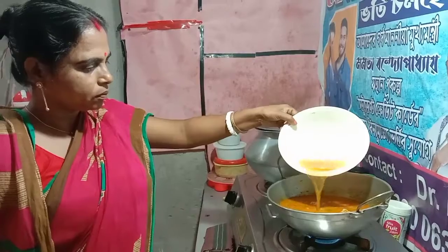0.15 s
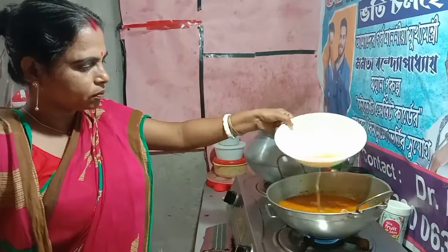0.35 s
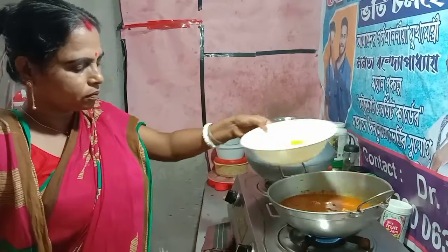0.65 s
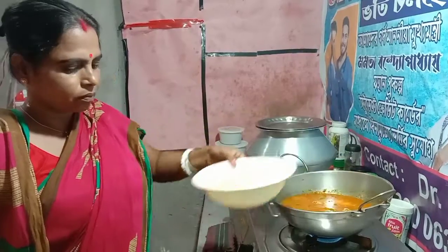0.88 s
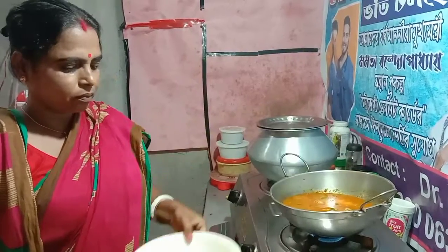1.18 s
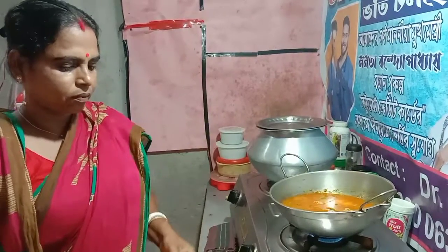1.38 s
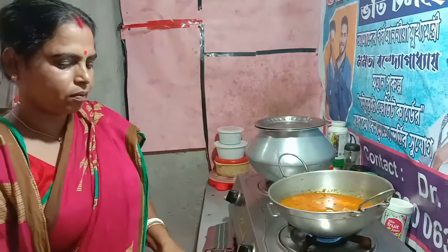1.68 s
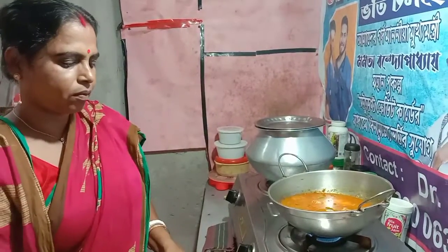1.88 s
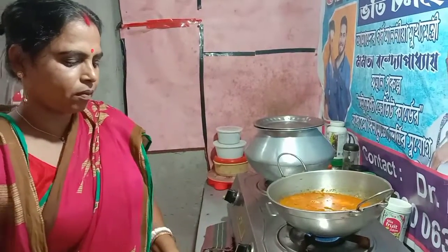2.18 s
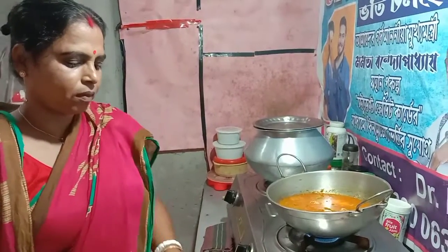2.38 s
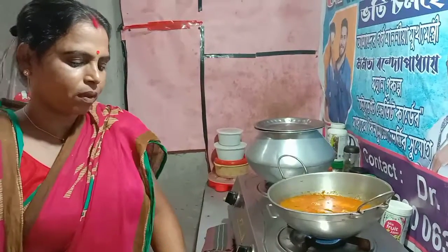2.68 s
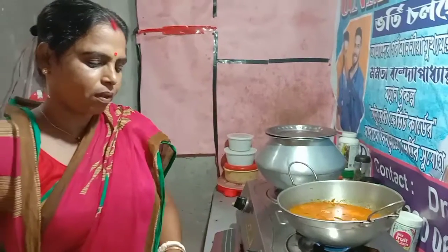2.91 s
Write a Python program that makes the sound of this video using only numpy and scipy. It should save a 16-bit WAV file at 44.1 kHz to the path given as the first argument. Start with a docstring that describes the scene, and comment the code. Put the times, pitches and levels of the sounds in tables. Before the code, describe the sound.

Metal cookware lands loudly, drags grittily and squeals in a small kitchen over a faint simmer.

```python
"""A quiet kitchen: a pan simmers in uneven coloured noise, with low resonances that knock and gurgle.
A few drops tick as short noise bands, then a steel bowl is put down: noise bursts and ringing modes.
A steel vessel lands with a clang and is dragged: gritty noise scrapes, more bursts bump, and gliding
tones with overtones squeal, jumping from mode to mode."""
import sys
import numpy as np
from scipy import signal
from scipy.fft import rfft, irfft, next_fast_len
from scipy.io import wavfile
from scipy.ndimage import uniform_filter1d

SR = 44100
rng = np.random.default_rng(int(sys.argv[2]) if len(sys.argv) > 2 else 0)


def linear_from_db(decibels):
    """Turn decibels (scalar or array-like) into linear amplitude factors; 0 gives 1."""
    return 10 ** (np.asarray(decibels, float) / 20)


def store_pcm(level_fs):
    """Save levels as 16-bit WAV."""
    pcm = np.round(np.clip(level_fs, -1, 1) * 32767).astype(np.int16)
    wavfile.write(sys.argv[1], SR, np.atleast_2d(pcm).T)


N = 134505  # length in samples


def evened(x):
    """Scales a signal to an rms of one."""
    return x / np.sqrt(np.mean(x ** 2) + 1e-20)


def read(points, hz):
    """Reads a curve of (frequency, dB) points, straight over log frequency."""
    f, value = np.transpose(points)
    return np.interp(np.log(hz + 1), np.log(f + 1), value)


def add(mix, s, sound):
    """Lays a sound into the mix from s seconds on."""
    part = mix[round(s * SR):][:len(sound)]
    part += sound[:len(part)]


def coloured(x, gain):
    """Filters by a gain given from zero to the top frequency, padded so that nothing wraps round."""
    size = 2 * next_fast_len(len(x) // 2 + SR // 8)
    place = np.linspace(0, 1, size // 2 + 1)
    full_gain = np.interp(place, np.linspace(0, 1, len(gain)), gain)
    return irfft(rfft(x, size) * full_gain)[:len(x)]


def slow(per_s):
    """Smooth random wander with an rms of one: white noise averaged twice over 1 / per_s seconds."""
    size = max(int(SR / per_s), 2)
    return evened(uniform_filter1d(uniform_filter1d(rng.standard_normal(N), size), size))


def steady_floor():
    """Unchanging background hiss: white noise with a fixed colour."""
    # Each row: frequency in Hz, relative density in dB per Hz.
    floor_colour = [(29, -34), (50, -3), (296, -2), (1010, -6.5), (1280, 2.5), (3430, -14), (5820, -19),
                    (7390, -7), (8140, -20), (9860, -13), (13500, -15.5), (15600, -6.5)]
    floor_db = -61
    gain = linear_from_db(read(floor_colour, np.fft.rfftfreq(N, 1 / SR)))
    return linear_from_db(floor_db) * evened(coloured(rng.standard_normal(N), gain))


def patchy_grit():
    """White noise with sparse grains, made patchy over time and frequency."""
    grains_per_s, grain_spread_db, grain_share, patch_db = 2500, 1.3, 0.38, 4.3
    grain_db = grain_spread_db * np.minimum(rng.exponential(1, N), 3.5)
    grit = rng.standard_normal(N) * linear_from_db(grain_db)
    grit *= rng.random(N) < grains_per_s / SR
    drive = rng.standard_normal(N) + grain_share * evened(grit)
    z = signal.stft(drive, nperseg=512, noverlap=384)[2]
    patches = uniform_filter1d(rng.standard_normal(z.shape), 5, 0)  # smooth across frequency
    patches = evened(uniform_filter1d(patches, 20, 1))  # smooth across time
    return signal.istft(z * linear_from_db(patch_db * patches), nperseg=512, noverlap=384)[1][:N]


def simmer_and_scrape():
    """Hiss and grit of simmer, handling and scraping through steel resonances, in four moving bands."""
    # Two stretches. Each row: time in seconds, then rumble, low and middle level in dB;
    # the middle is lifted by middle_lift_db below.
    band_levels = [
        [(0.11, -87, -68.5, -68.5), (0.165, -77, -63, -59), (0.47, -73, -58.5, -61), (0.54, -60, -55, -64),
         (0.672, -81, -70, -78.5), (0.79, -67, -51.5, -50.5), (0.858, -51.5, -49, -47),
         (1.03, -66, -57.5, -57.5), (1.138, -79, -60.5, -64.5), (1.168, -68, -73, -55.5),
         (1.262, -68, -49, -40.5), (1.512, -74, -68.5, -65.5), (1.748, -73, -59.5, -63),
         (1.765, -66, -53.5, -57.5)],
        [(1.8, -35.5, -39, -42.5), (1.918, -45, -44.5, -51), (2.056, -46, -38.5, -37.5),
         (2.322, -65.5, -50, -45), (2.38, -41.5, -35.5, -44), (2.416, -44.5, -40, -54.5),
         (2.586, -52.5, -48.5, -37), (2.676, -83, -40, -42), (2.77, -49, -33.5, -45.5),
         (2.916, -63.5, -65, -50), (3.018, -43, -53, -39.5), (3.05, -60, -21.5, -27)],
    ]
    # Each row: time in seconds, level of the treble hiss in dB.
    treble_level = [(0, -85), (1.12, -70), (1.19, -57), (1.26, -70), (1.42, -60.5), (1.765, -66.5),
                    (1.79, -38), (1.92, -69.5), (2.0, -47), (2.06, -45.5), (2.12, -55), (2.145, -36),
                    (2.22, -54), (2.47, -52), (2.56, -47.5), (2.67, -44), (2.8, -57), (3.0, -48),
                    (3.05, -32)]
    # Borders between rumble, low, middle and treble, in Hz.
    split_hz = [300, 1800, 6200]
    # Colour below the treble band. Each row: frequency in Hz, relative density in dB per Hz.
    noise_colour = [(29, -39), (50, -5), (243, -5), (501, -8.5), (1250, -13), (1400, -14.5), (3490, 14.5),
                    (5710, 2.5), (8200, -6), (10700, -74), (18000, -120)]
    # Resonances of the steel. Each row: frequency in Hz, width in Hz, height over the noise in dB.
    body = [(84.8, 15.3, 14.5), (165.8, 13, 9.5), (1260, 100, 14.5), (2170, 44, 8.5), (2576, 210, 6),
            (3920, 280, 5), (5630, 180, 16.5)]
    # Colour of the treble band. Each row: frequency in Hz, relative density in dB per Hz.
    treble_colour = [(4120, 15), (7000, 8), (8030, 2.5), (10200, 3.5), (12200, -9), (13300, -17),
                     (14800, 5.5), (15600, -56.5)]
    middle_lift_db = 4

    hz, t = np.fft.rfftfreq(N, 1 / SR), np.arange(N) / SR
    drive = patchy_grit()
    resonance_db = sum(db / (1 + (2 * (hz - f) / w) ** 2) for f, w, db in body)
    steel_gain = linear_from_db(read(noise_colour, hz) + resonance_db)
    gains = [steel_gain, steel_gain, steel_gain, linear_from_db(read(treble_colour, hz))]
    # share of the power below each border; neighbours differ by one band
    below = [0 * hz] + [1 / (1 + (hz / f) ** 12) for f in split_hz] + [1 + 0 * hz]
    s, rumble, low, middle = np.vstack(band_levels).T
    levels = [(s, rumble), (s, low), (s, middle + middle_lift_db), np.transpose(treble_level)]
    out = np.zeros(N)
    for k in range(4):
        band_gain = gains[k] * np.sqrt(abs(below[k + 1] - below[k]))
        out += linear_from_db(np.interp(t, *levels[k])) * evened(coloured(drive, band_gain))
    return out


def hollow(s, hz, db, t60):
    """One low resonance that swells quickly and dies."""
    rise_s = 0.0085
    t = np.arange(SR // 2) / SR
    envelope = np.minimum(t / rise_s, 1) * linear_from_db(db - 60 * t / t60)
    return s, envelope * np.sin(2 * np.pi * (hz * t + rng.random()))


def hollows(mix):
    """Hollow knocks and gurgles, each a single decaying resonance."""
    # Each row: start in seconds, frequency in Hz, level in dB, decay t60 in seconds.
    knocks = [(0.444, 1286, -50, 0.37), (0.797, 369.5, -47, 0.32), (1.04, 359, -41, 0.067),
              (1.239, 421, -56, 0.39), (2.058, 250, -38, 0.19), (2.082, 343.3, -43.5, 0.74),
              (2.081, 452.4, -35, 0.31), (2.362, 166.7, -36.5, 0.33), (2.361, 233.7, -42.5, 0.52),
              (2.469, 178, -35.5, 0.22), (2.733, 83.5, -34.5, 0.19), (2.732, 160, -40, 0.3)]
    for row in knocks:
        add(mix, *hollow(*row))


def tick(s, db, hz):
    """A short band of noise around one frequency, over a faint wide spread."""
    t60, trim_db, width_hz, wide_share = 0.035, -7, 380, 0.02
    t = np.arange(SR // 8) / SR
    band = 1 / (1 + ((np.fft.rfftfreq(len(t), 1 / SR) - hz) / width_hz) ** 2) + wide_share
    envelope = linear_from_db(db + trim_db - 60 * t / t60)
    return s, envelope * evened(coloured(rng.standard_normal(len(t)), band))


def drops(mix):
    """Drops and ticks, each a quickly dying noise band."""
    # Each row: start in seconds, level in dB before the trim in tick(), centre in Hz.
    tick_list = [(0.439, -34.5, 5660), (0.5297, -27, 4260), (0.582, -37, 4860)]
    for row in tick_list:
        add(mix, *tick(*row))


def blow(s, db, t60, ring_db, modes, colour, split):
    """A burst of rattling noise and the ringing modes of the thing struck, damped by the contact."""
    crack_db, crack_t60, rise_s = -1, 0.012, 0.00086
    rattle_db, ring_longer, luck_db = -5.5, 1.8, 7.9
    t = np.arange(SR // 2) / SR
    gain = linear_from_db(read(colour, np.fft.rfftfreq(len(t), 1 / SR)))
    burst = evened(coloured(rng.standard_normal(len(t)), gain))
    cluster = modes * 3  # every mode is a close cluster of three
    ring = np.zeros(len(t))
    for (f, mode_db, long), (u, phase, w) in zip(cluster, rng.random((len(cluster), 3))):
        decay = linear_from_db(mode_db + luck_db * u - 60 * t / min(long, ring_longer * t60))
        hz = f * (1 + split * (2 * w - 1))
        ring += decay * np.sin(2 * np.pi * hz * t + 2 * np.pi * phase)
    rattle = linear_from_db(rattle_db - 60 * t / t60) + linear_from_db(crack_db - 60 * t / crack_t60)
    return s, linear_from_db(db) * np.minimum(t / rise_s, 1) * (rattle * burst + linear_from_db(ring_db) * ring)


def bowl_down(mix):
    """The steel bowl touches down; it rings more cleanly than the vessel, its clusters being tighter."""
    # Each row: start in seconds, level in dB, rattle t60 in seconds, ring level against it in dB.
    taps_down = [(1.21, -57.5, 0.37, 16), (1.2349, -22.5, 0.08, -9)]
    # Modes. Each row: frequency in Hz, least level in dB, longest decay t60 in seconds.
    bowl_modes = [(2533, -4.5, 0.57), (3973, -9.5, 0.48), (5500, -17, 0.29)]
    # Colour of the burst. Each row: frequency in Hz, relative density in dB per Hz.
    bowl_colour = [(2650, -45), (4500, -10), (5540, -8), (8180, -19.5), (11600, -4), (15600, -6)]
    for row in taps_down:
        add(mix, *blow(*row, bowl_modes, bowl_colour, split=0.005))


def vessel_bumps(mix):
    """The steel vessel lands and bumps along, each blow a rattle with widely clustered modes."""
    # Each row: start in seconds, level in dB, rattle t60 in seconds.
    bump_list = [(1.775, -12, 0.22), (2.136, -21, 0.039), (2.354, -30.5, 0.054), (2.6314, -23.5, 0.039),
                 (2.6603, -14.5, 0.054), (2.746, -28.5, 0.062), (2.818, -27.5, 0.027), (3.035, -32, 0.4)]
    # Modes. Each row: frequency in Hz, least level in dB, longest decay t60 in seconds.
    vessel_modes = [(1320, -12.5, 0.1), (2010, -15, 0.36), (2870, -7.5, 0.056), (3274, -9, 0.5),
                    (3517, -4, 0.076), (3610, -13, 0.3), (3860, -9, 0.47), (4800, -38, 0.19)]
    # Colour of the burst. Each row: frequency in Hz, relative density in dB per Hz.
    bump_colour = [(60, -47), (487, -21), (912, -18.5), (1260, -3.5), (1420, -19), (2060, -9.5),
                   (2700, -13.5), (3500, 3), (4100, -2), (5860, -23.5), (15600, -30)]
    for row in bump_list:
        add(mix, *blow(*row, -10, vessel_modes, bump_colour, split=0.014))  # ring at -10 dB


def squeals():
    """Stick-slip locks onto modes; the contact adds overtones, sum and difference tones."""
    # One curve per squeal. Each row: time in seconds, pitch in Hz, level in dB.
    squeal_curves = [
        [(1.98, 4990, -48), (2.062, 4964, -35), (2.114, 4953, -42), (2.204, 5011, -26), (2.232, 4988, -36),
         (2.296, 4984, -30), (2.45, 4980, -41)],
        [(2.17, 2828, -33), (2.255, 2798, -26), (2.282, 2792, -38), (2.4, 2794, -44)],
        [(2.2, 5613, -53), (2.25, 5580, -30), (2.304, 5566, -20), (2.37, 5547, -32), (2.395, 5544, -46)],
        [(2.3, 2561, -47), (2.356, 2584, -25), (2.436, 2577, -22), (2.476, 2540, -18), (2.568, 2592, -29),
         (2.616, 2538, -30), (2.645, 2545, -37)],
        [(2.59, 5842, -41), (2.63, 5855, -20), (2.654, 5858, -18), (2.684, 5883, -23), (2.71, 5857, -18),
         (2.77, 5823, -23), (2.802, 5871, -31), (2.856, 5844, -32), (2.89, 5790, -41), (2.95, 5810, -43)],
        [(2.79, 5339, -52), (2.822, 5280, -30), (2.854, 5320, -19), (2.886, 5329, -16), (2.91, 5324, -22),
         (2.94, 5329, -21), (3.018, 5225, -26), (3.05, 5323, -27)],
        [(2.795, 3300, -44), (2.83, 3419, -29), (2.93, 3400, -31), (2.97, 3290, -32), (3.03, 3170, -33)],
        [(2.82, 3826, -48), (2.88, 3860, -33), (2.95, 3930, -33), (3.05, 3870, -34)],
        [(2.88, 4914, -42), (3.002, 4982, -35), (3.05, 4932, -24)],
    ]
    # One row per squeal: levels of harmonics 2 and up, in dB against its fundamental.
    overtone_levels = [
        [-17, -27.5],
        [-22],
        [-56],
        [-16.5, -33, -27, -40],
        [-27.5],
        [-15],
        [-19, -29],
        [-45],
        [-33],
    ]
    sum_db, difference_db, third_order_db = -12, -8, -5  # tones that two squeals make together
    waver_hz, waver_per_s, fuzz_db, fuzz_per_s = 5.84, 58.4, -9, 108
    beat_hz, beat_waver_hz, twin_db = 40, 14, -8  # every mode has a close twin that beats against it
    neighbours = 1.2  # modes closer than this ratio do not mix
    low_hz = 1750  # the steel hardly radiates tones below this

    t, out, waves = np.arange(N) / SR, np.zeros(N), []
    for curve, overtones in zip(squeal_curves, overtone_levels):
        s, hz, db = np.transpose(curve)
        edge = np.clip(np.minimum(t - s[0], s[-1] + 0.015 - t) / 0.041, 0, 1)
        fuzz = 1 + linear_from_db(fuzz_db) * slow(fuzz_per_s)
        level = np.sqrt(2) * linear_from_db(np.interp(t, s, db)) * edge * fuzz
        pitch = np.interp(t, s, hz) + waver_hz * slow(waver_per_s)
        turn = np.exp(2j * np.pi * (rng.random() + np.cumsum(pitch) / SR))
        beat = beat_hz + beat_waver_hz * slow(waver_per_s / 2)
        twin = linear_from_db(twin_db) * np.exp(2j * np.pi * (rng.random() + np.cumsum(beat) / SR))
        level = level * abs(1 + twin) / np.hypot(1, linear_from_db(twin_db))
        harmonics = sum(linear_from_db(o) * turn ** (k + 2) for k, o in enumerate(overtones))
        out += level * (turn + harmonics).real
        waves.append((level, turn, hz.mean()))

    total = sum(abs(level) for level, turn, hz in waves) + 1e-4
    for k, (a, p, f) in enumerate(waves):
        for b, q, g in waves[k + 1:]:
            if (a * b).any() and max(f / g, g / f) > neighbours:
                second = linear_from_db(sum_db) * p * q + linear_from_db(difference_db) * p / q
                out += (a * b / total * second).real
                # twice one pitch, plus and minus the other
                third = a * p * p * (q + 1 / q) + b * q * q * (p + 1 / p)
                out += linear_from_db(third_order_db) * (a * b / total ** 2 * third).real
    return signal.sosfilt(signal.butter(6, low_hz, "high", fs=SR, output="sos"), out)


def room(x):
    """Sparse echoes of random sign, dying away."""
    t60, top_hz = 0.28, 6000
    taps, at = np.zeros(SR // 2), np.arange(200, SR // 2 - 20, 20)
    at = at + rng.integers(0, 20, len(at))
    taps[at] = rng.choice([-1., 1.], len(at)) * linear_from_db(-60 * at / SR / t60)
    taps = signal.lfilter(*signal.butter(1, top_hz, fs=SR), taps)
    return signal.fftconvolve(x, taps / np.linalg.norm(taps))[:N]


def dip_treble(x):
    """Two narrow dips in the treble of everything heard."""
    # Each row: centre in Hz, width in Hz, depth in dB.
    treble_dips = [(8250, 450, -14), (13700, 700, -13)]
    hz = np.fft.rfftfreq(N, 1 / SR)
    return coloured(x, linear_from_db(sum(db * np.exp(-((hz - f) / w) ** 2) for f, w, db in treble_dips)))


def scene():
    """Tones and blows with their room echoes, over the noise, as one channel."""
    room_db = -9
    near = squeals()
    vessel_bumps(near)
    bowl_down(near)
    drops(near)
    hollows(near)
    background = steady_floor() + simmer_and_scrape()
    return dip_treble(near + linear_from_db(room_db) * room(near) + background)[None]


def roll_off(x):
    """The treble ends steeply here."""
    return signal.sosfilt(signal.butter(12, 15720, fs=SR, output="sos"), x)


def record(dry):
    """The microphone loses the lowest bass."""
    low_cut_hz = 86
    low_cut = signal.butter(2, low_cut_hz, "high", fs=SR, output="sos")
    return roll_off(signal.sosfilt(low_cut, dry))


dry = scene()
out = record(dry)
store_pcm(out)
```